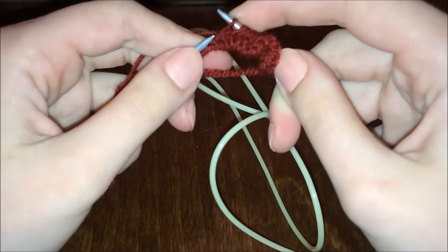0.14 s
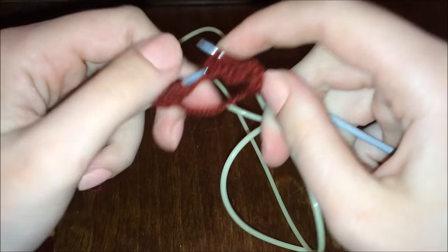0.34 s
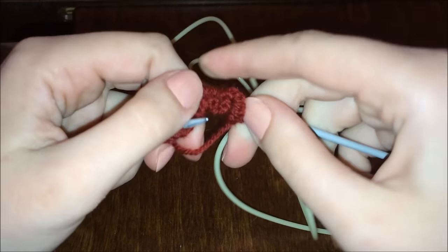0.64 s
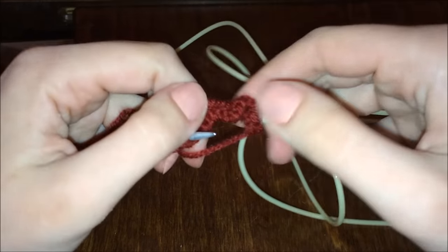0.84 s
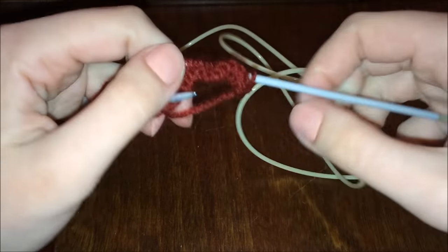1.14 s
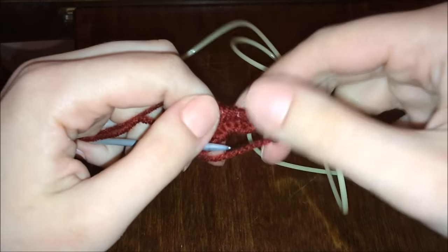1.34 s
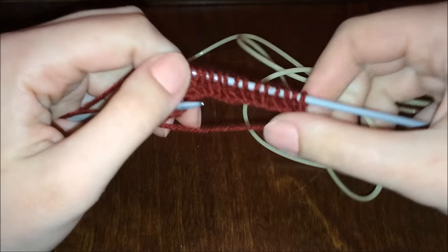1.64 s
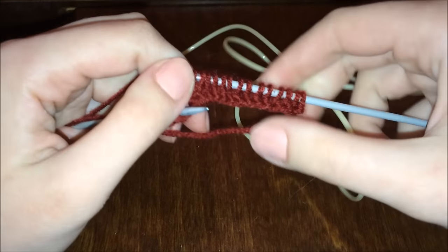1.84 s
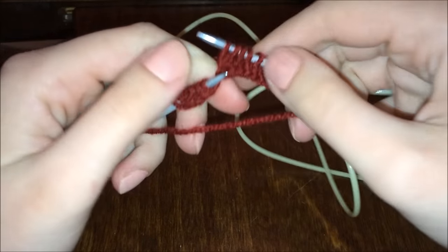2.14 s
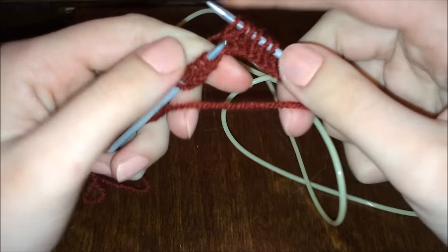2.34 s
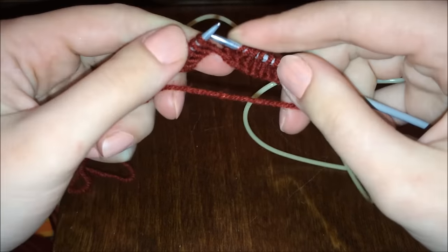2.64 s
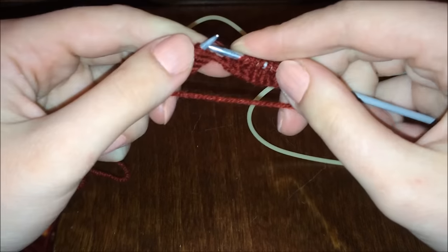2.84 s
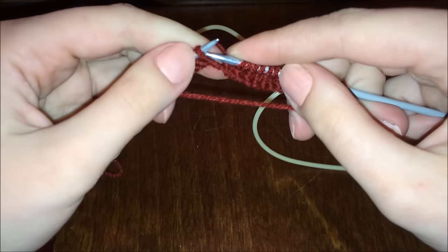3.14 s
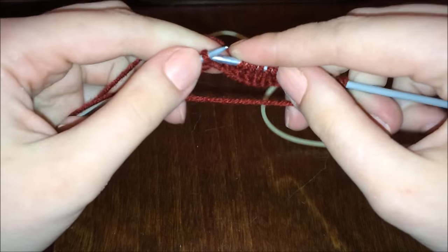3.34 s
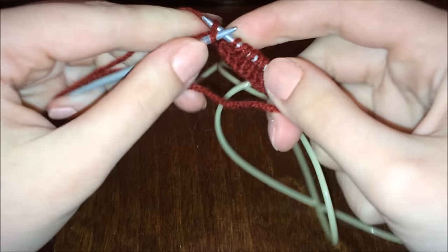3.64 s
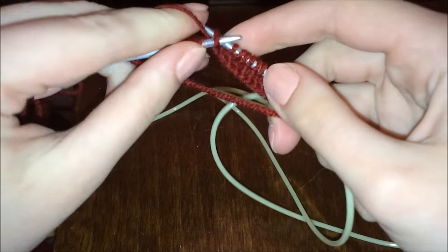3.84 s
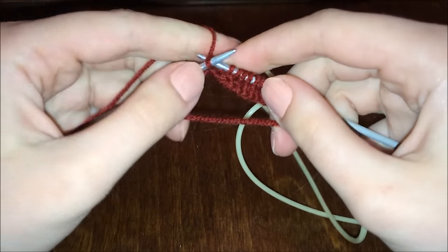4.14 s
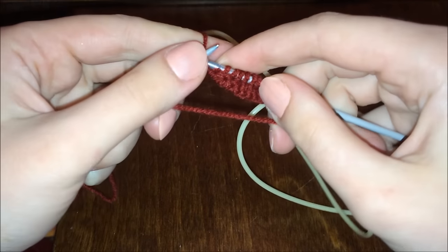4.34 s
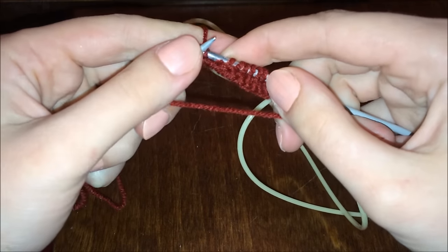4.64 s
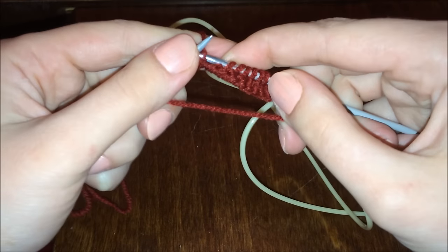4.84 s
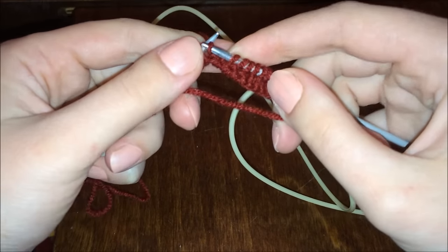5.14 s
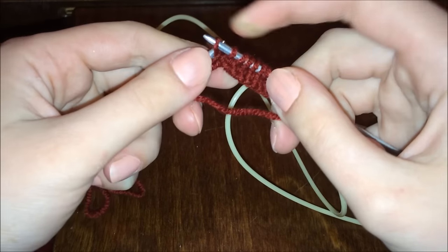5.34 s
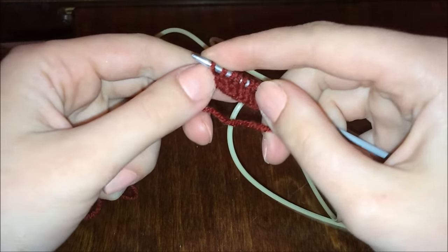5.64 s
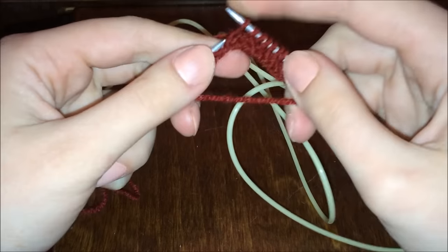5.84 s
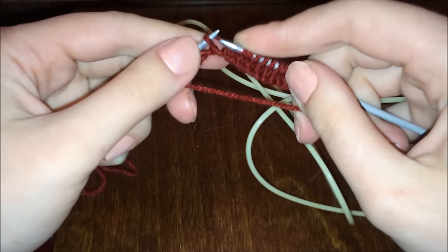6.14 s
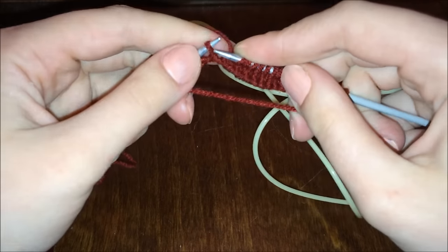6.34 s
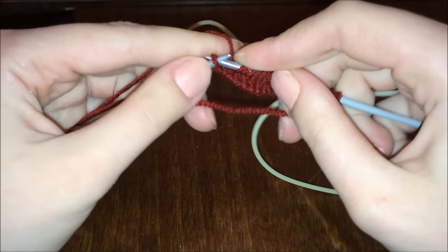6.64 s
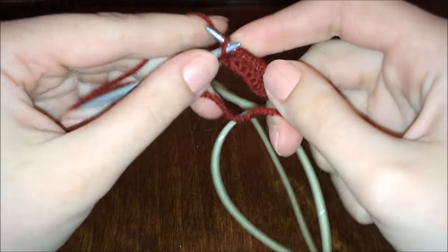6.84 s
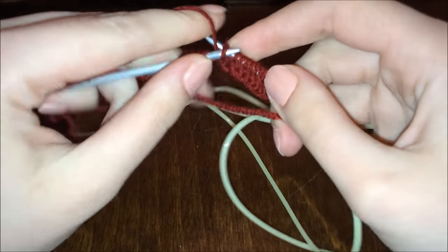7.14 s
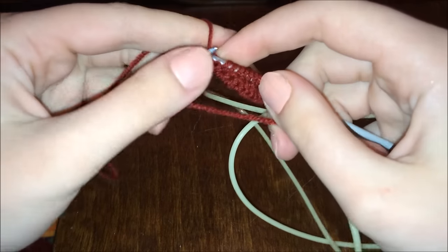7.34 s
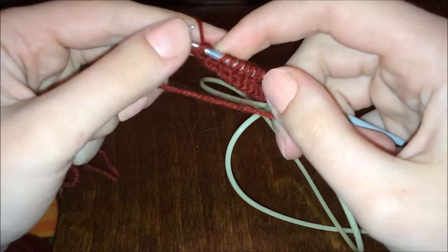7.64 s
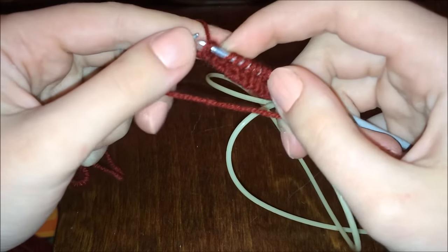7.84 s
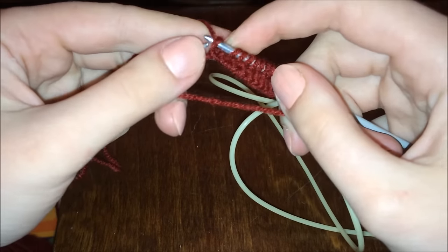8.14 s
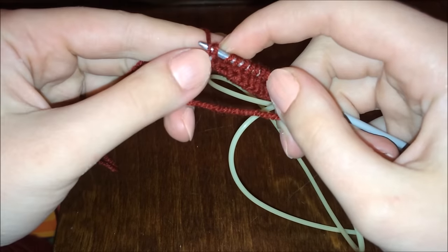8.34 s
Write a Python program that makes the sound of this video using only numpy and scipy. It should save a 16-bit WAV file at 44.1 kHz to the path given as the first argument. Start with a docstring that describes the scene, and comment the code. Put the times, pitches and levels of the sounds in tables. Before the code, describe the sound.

Close phone pickup in a small quiet room: after a faint tick and yarn rustle, hollow metal needles click in a dense irregular burst while their cord raps a wooden table, one early knock by far the loudest. The clicks then thin out to a few isolated taps among soft scuffs, faint low thumps and hand movement over a steady noise floor.

```python
"""Hands knit with hollow metal needles over a wooden table in a small quiet room, close to a phone.
A faint click and a rustle of yarn open; from 0.9 to 3.8 s needles click densely, as cracks and dying modes,
and from 1.1 to 3.6 s their cord knocks on the table, waking its modes. From 2.8 s soft low thumps join;
then clicks thin out to a faint last one at 8.4 s. Scuffs of shaped noise come and go until 7.8 s.
Arm rumble, skin shuffle and a floor of noise run throughout; clicks and knocks leave a short room tail."""
import sys
import numpy as np
from scipy import signal
from scipy.fft import rfft, irfft
from scipy.io import wavfile
from scipy.ndimage import uniform_filter1d

SR = 44100
rng = np.random.default_rng(int(sys.argv[2]) if len(sys.argv) > 2 else 0)


def unload_wav(signal):
    """Save mono or channel-first audio to the path in sys.argv[1] as 16-bit WAV at rate SR, clipped to [-1, 1]."""
    wavfile.write(
        sys.argv[1],
        SR,
        np.round(np.clip(np.atleast_2d(signal).T, -1, 1) * 32767).astype(np.int16),
    )


N = 375291  # length in samples


# needle on needle: start_s, shaft_peak_db, tip_peak_db, brightest_tip_pitch_hz, lift_of_that_pitch_db
NEEDLE_CLICKS = [(0.219, -61, -52.5, 8500, 7), (0.853, -30.5, -31, 4670, 12),
                 (1.043, -26.5, -25.5, 4630, 15), (1.08, -19, -17.5, 5500, 13),
                 (1.256, -33.5, -41.5, 6610, 13), (1.263, -52, -45.5, 6400, 5),
                 (1.318, -63, -39.5, 7900, 12), (1.341, -31.5, -44.5, 3400, 6),
                 (1.452, -34.5, -51.5, 6500, 23), (1.78, -34.5, -36.5, 3700, 18),
                 (2.19, -73, -50, 8000, -3), (2.228, -54.5, -52, 3070, 6), (2.478, -29, -34.5, 6800, 10),
                 (2.542, -28.5, -38.5, 4700, 10), (2.66, -54, -49.5, 3130, 6),
                 (2.734, -28.5, -32.5, 4660, 4), (2.765, -34, -44, 3150, 15),
                 (3.055, -33, -31.5, 9000, 15.5), (3.061, -29.5, -58, 3140, 5),
                 (3.553, -53, -40.5, 8060, -2), (3.568, -55, -53, 4500, 11), (3.593, -27.5, -34, 3200, 4),
                 (3.84, -57, -45.5, 3980, 12), (4.082, -58, -42, 5200, 11), (4.604, -26, -26, 4800, 9),
                 (5.066, -65, -53.5, 10700, 16), (5.849, -27, -26, 4800, 13.5),
                 (6.95, -42, -34.5, 6350, 11), (7.738, -50.5, -51, 3240, -2), (7.778, -67, -49, 11200, 4),
                 (8.41, -66, -45, 4320, 29)]
# modes of a held needle's shaft, the lowest row the table beneath it: pitch_hz, level_db, t60_s
SHAFT_MODES = [(158.3, -16, 0.17), (237, -11, 0.11), (907, 5.5, 0.017), (1110, -2, 0.015), (1280, 1, 0.049),
               (1665, 1.5, 0.02), (1842, -6, 0.029), (2150, -1, 0.023), (2290, -2.5, 0.04),
               (2765, -10.5, 0.045)]
# short ring of the tips: pitch_hz, level_db, t60_s
TIP_RING_MODES = [(2070, -4, 0.023), (2770, -15, 0.01), (3130, -6.5, 0.02), (3750, -10.5, 0.029),
                  (4330, -11.5, 0.011), (4640, -10, 0.0057), (5330, -5.5, 0.015), (6030, -5, 0.011),
                  (7300, -12, .014), (8090, -10, 0.017), (9100, -11, .01)]
# colour of the tips' crack: pitch_hz, level_db (per Hz)
TIP_CRACK = [(1500, -10), (2500, -4.5), (3180, -2.5), (3500, -7), (3750, -9.5), (4300, -12), (4750, -6.5),
             (5100, -15.5), (5370, -9.5), (5900, -16.5), (6600, -8), (7150, -9.5), (7900, -17),
             (9300, -14.5), (11000, -20.5), (13000, -18.5), (15500, -26)]
TIP_RING_DB = -3  # peak of the ring against the crack
# a firm tap sounds flat, a lighter touch is brighter: tilt in dB per octave for each dB below firm
FIRM_TIP_DB, SHARPEN_PER_DB = -29, 0.41


def clicks(scatter_db=1.5, detune=0.006, shaft_lag_s=0.0007):
    """The tips crack, then tips and shafts ring; rows: towards the phone, towards the walls."""
    out = np.zeros((2, N))
    shaft_hz, shaft_mode_db, shaft_t60 = np.transpose(SHAFT_MODES)
    ring_hz, ring_db, ring_t60 = np.transpose(TIP_RING_MODES)
    against = np.pi * np.arange(len(shaft_hz))  # neighbouring modes swing against each other
    push = twice(contact_s=0.00045, again_s=0.001072, again_db=-11.5)
    for start_s, shaft_db, tip_db, tip_hz, lift_db in NEEDLE_CLICKS:
        sharp_db = SHARPEN_PER_DB * (FIRM_TIP_DB - tip_db)

        # where the needles touch and how the fingers hold them
        pitch_place, level_place = rng.standard_normal((2, len(shaft_hz)))
        mode_hz = shaft_hz * (1 + detune * pitch_place)
        mode_db = shaft_mode_db + scatter_db * level_place
        shaft = np.convolve(ring(mode_hz, mode_db, shaft_t60, against), push)
        shaft = peaked(shaft, shaft_db)

        pitch_place, level_place, phase_place = rng.standard_normal((3, len(ring_hz)))
        tip_mode_hz = ring_hz * (1 + detune * pitch_place)
        # the brightest pitch beams at the phone; averaged over all directions it stands out less
        for side, share in zip(out, (1, 1 / 3)):
            side_lift_db = share * lift_db
            peak_db = tip_db - (1 - share) * lift_db / 2
            tip_crack = crack(TIP_CRACK, 0.001256, tip_hz, side_lift_db, sharp_db)
            tip_mode_db = ring_db + touch(ring_hz, tip_hz, side_lift_db, sharp_db)
            tip_mode_db = tip_mode_db + scatter_db * level_place
            tip_ring = ring(tip_mode_hz, tip_mode_db, ring_t60, np.pi * phase_place)
            add(side, start_s, peaked(tip_crack, peak_db))
            add(side, start_s + shaft_lag_s, shaft)
            add(side, start_s + shaft_lag_s, peaked(tip_ring, peak_db + TIP_RING_DB))
    return out


# cord on the table, before the low cut: start_s, body_peak_db, hardness_db (per octave), crack_peak_db
CORD_KNOCKS = [(1.081, -10, 3, -19.5), (1.288, -26, -4, -65), (1.355, -24.5, -3.5, -70),
               (1.808, -17.5, -0.5, -34), (2.555, -17.5, 2.5, -34.5), (2.751, -20, -1.5, -43),
               (3.074, -23.5, 0, -65), (3.61, -19.5, -0.5, -35.5)]
# modes of the wooden top: pitch_hz, level_db, t60_s
TABLE_MODES = [(161.3, -15, 0.18), (224.3, -5, 0.15), (342, -5, 0.057), (541, 1.5, 0.046), (643, -3, 0.045),
               (826, 6.5, 0.013), (1130, -0.5, 0.021), (1324, -7.5, 0.041), (1480, -3, 0.019),
               (1629, 4, 0.057), (2060, -21, 0.0073), (2530, -16, 0.09), (3110, 6, 0.078), (4450, 3, 0.017),
               (5400, -14, .012)]
# colour of cord cracking on wood: pitch_hz, level_db (per Hz)
CORD_CRACK = [(1500, -35), (2500, 7), (4000, 1), (6000, -9), (9000, -12), (15500, -26)]
TABLE_LOW_HZ = 109  # the top radiates little below this


def knocks(scatter_db=2.5, body_lag_s=0.001317):
    """The cord cracks, then slaps twice as it lies down; a harder slap wakes the top's higher modes."""
    out = np.zeros(N)
    hz, db, t60 = np.transpose(TABLE_MODES)
    push = twice(contact_s=0.00055, again_s=0.0015, again_db=2.5)
    for start_s, body_db, hard_db, crack_db in CORD_KNOCKS:
        hardness = hard_db * np.log2(hz / hz[2])  # tilt about the third mode
        mode_db = db + hardness + scatter_db * rng.standard_normal(len(hz))
        body = np.convolve(ring(hz, mode_db, t60, np.pi / 2), push)
        add(out, start_s + body_lag_s, peaked(body, body_db))
        add(out, start_s, peaked(crack(CORD_CRACK, 0.00154), crack_db))
    low_cut = signal.butter(2, TABLE_LOW_HZ, "high", fs=SR, output="sos")
    return signal.sosfilt(low_cut, out)


# yarn or a finger slips along a shaft: middle_s, length_s, rustle_db, rub_db
SHAFT_SCUFFS = [(0.425, 0.11, -72, -79), (0.831, 0.036, -63, -80), (1.113, 0.16, -58, -51),
                (1.456, 0.095, -75, -66.5), (1.676, .3, -62.5, -76), (2.092, 0.059, -67.5, -64),
                (2.204, 0.018, -66, -74), (2.262, 0.14, -68.5, -63.5), (3.216, 0.37, -104, -73),
                (3.575, .04, -70, -59), (3.917, 0.2, -84, -68), (4.067, 0.082, -73, -54),
                (4.144, 0.17, -73, -64.5), (4.886, 0.026, -61.5, -69), (5.4, 0.064, -74, -84),
                (5.924, 0.036, -68, -75), (6.063, .04, -76, -64.5), (6.285, 0.081, -89, -66.5),
                (6.887, 0.12, -64, -65), (6.959, 0.15, -62.5, -65), (7.102, 0.27, -78, -69.5),
                (7.375, 0.06, -67.5, -60.5), (7.56, 0.076, -77, -66.5), (7.748, 0.023, -60.5, -66)]
# colour of yarn fibres: pitch_hz, level_db (per Hz)
YARN_COLOUR = [(500, 6), (2000, -24), (4000, -4.5), (9000, -5), (15000, -3.5)]
# colour of needles rubbing: pitch_hz, level_db (per Hz)
RUB_COLOUR = [(400, -25), (700, 0), (1100, -6), (1500, -3), (2100, -2), (2900, -11), (3500, -8), (4500, -5),
              (5300, -9), (6000, -18), (9000, -26)]
YARN_DB, YARN_SWELL_DB = -75, 3.5  # constant hiss under the scuffs, depth of its slow wander


def scuffs():
    """Fibres hiss over the shafts and needles scrape along each other: flickering noise in swells."""
    yarn_gain = undb(YARN_DB + YARN_SWELL_DB * walk(12))
    rub_gain = np.zeros(N)
    for middle_s, length_s, rustle_db, rub_db in SHAFT_SCUFFS:
        swell = np.hanning(int(length_s * SR))
        add(yarn_gain, middle_s - length_s / 2, undb(rustle_db) * swell)
        add(rub_gain, middle_s - length_s / 2, undb(rub_db) * swell)
    fibres = coloured(YARN_COLOUR, N) * undb(3 * walk(400) + 2 * walk(40))
    rub = coloured(RUB_COLOUR, N) * undb(3 * walk(300))
    return unit(fibres) * yarn_gain + unit(rub) * rub_gain


# a wrist or the yarn ball settles on the table: start_s, peak_db, pitch_hz
SETTLING_THUMPS = [(2.807, -44.5, 179), (4.877, -59.5, 72.7), (5.439, -62, 270), (5.5, -47.5, 59),
                   (6.009, -62, 133), (6.224, -57, 96), (6.275, -56.5, 264), (6.837, -58, 109),
                   (7.649, -61.5, 274), (7.736, -58, 77)]


def thumps(t60=0.13, rise_s=0.0058):
    """Soft low pushes on the table: decaying sines with a rounded onset."""
    out = np.zeros(N)
    t = np.arange(int(SR / 4)) / SR
    for start_s, peak_db, hz in SETTLING_THUMPS:
        envelope = (1 - np.exp(-t / rise_s)) * fade(t, t60)
        add(out, start_s, peaked(envelope * np.sin(2 * np.pi * hz * t), peak_db))
    return out


# moving hands, gliding from point to point: time_s, arm_rumble_db
ARM_MOVEMENT = [(0.0, -68.5), (0.23, -69.5), (1.16, -62), (1.26, -63.5), (1.54, -68), (1.78, -65),
                (2.58, -73), (2.91, -60), (3.82, -62), (4.17, -77.5), (4.41, -79), (4.6, -72.5),
                (5.88, -65), (6.33, -67.5), (6.99, -71.5), (7.09, -71), (7.46, -83), (8.51, -67)]
# colour of the arms' rumble through the table: pitch_hz, level_db (per Hz)
ARM_COLOUR = [(20, -40), (45, 1), (80, -1), (150, 2.5), (260, -3.5), (450, -20), (900, -65)]
# colour of shuffling skin: pitch_hz, level_db (per Hz)
SKIN_COLOUR = [(300, -15), (600, -1), (1200, -3.5), (2200, -11.5), (3500, -15.5), (7000, -29)]
SKIN_DB, SKIN_FOLLOWS = -75, 0.95  # shuffle at mean movement; dB gained per dB of rumble


def arms_and_skin():
    """Moving arms shake the table as low noise; skin shuffles louder the more they move."""
    arm_db = np.interp(np.arange(N) / SR, *np.transpose(ARM_MOVEMENT))
    skin_gain = undb(SKIN_DB + SKIN_FOLLOWS * (arm_db - arm_db.mean()))
    skin = coloured(SKIN_COLOUR, N) * undb(2 * walk(100) + 2 * walk(20))
    arms = coloured(ARM_COLOUR, N) * undb(2.3 * walk(25))
    return unit(skin) * skin_gain + unit(arms) * undb(arm_db)


# bands of the room tail: centre_hz, level_db, t60_s
ROOM_BANDS = [(496, -48.5, 0.16), (1400, -46.5, 0.21), (2340, -41, 0.2), (5130, -42, 0.068),
              (9900, -38, 0.19)]


def room(dry, gap_s=0.005, build_s=0.00058):
    """Dense reflections after a short gap; each band dies at its own pace."""
    t = np.arange(int(SR / 2)) / SR
    tail = 0
    for hz, db, t60 in ROOM_BANDS:
        hump = [(hz / 4, -40), (hz / 1.5, -3), (hz, 0), (hz * 2.45, -3), (hz * 4, -40)]
        tail = tail + undb(db) * coloured(hump, len(t)) * fade(t, t60)
    tail = tail * (1 - np.exp(-t / build_s))
    tail = np.r_[np.zeros(int(gap_s * SR)), tail]
    return signal.fftconvolve(dry, tail)[:N]


# colour of the floor of room and microphone: pitch_hz, level_db (per Hz)
FLOOR_COLOUR = [(15, -7), (25, -19), (113, 0), (240, -8.5), (349, 0.5), (762, -9.5), (945, -5),
                (1240, -8.5), (1850, -9.5), (5010, -23), (12500, -26.5), (15500, -39)]
FLOOR_DB = -65.5


def noise_floor():
    """Noise of room and microphone, its level wavering slightly."""
    return coloured(FLOOR_COLOUR, N) * undb(FLOOR_DB + 0.85 * walk(18))


def crack(points, spread_s, peak_hz=5000., lift_db=0., sharp_db=0., size=1024):
    """A spectrum whose bands arrive scattered over a few ms, as bending waves along a rod do."""
    hz, db = np.transpose(points)
    f = np.maximum(np.fft.rfftfreq(size, 1 / SR), 1)
    colour_db = np.interp(np.log(f), np.log(hz), db, -90) + touch(f, peak_hz, lift_db, sharp_db)
    # one random delay for every four bins
    scatter = 0.5 + np.minimum(rng.exponential(size=size // 8 + 1), 3)
    lag_s = spread_s * np.repeat(scatter, 4)[:len(f)]
    turn = np.exp(-2j * np.pi * np.cumsum(lag_s) * SR / size)  # phase that gives these delays
    return irfft(undb(colour_db) * turn, size)[:size // 2]


def touch(f, peak_hz, lift_db, sharp_db):
    """Colour of one contact in dB: a favoured pitch and a tilt per octave about it."""
    favoured = lift_db / (1 + ((f - peak_hz) / 300.) ** 2)
    return favoured + sharp_db * np.log2(f / peak_hz)


def twice(contact_s, again_s, again_db):
    """Force of a contact that lands, lifts and lands again."""
    slap = np.hanning(int(contact_s * SR) + 3)
    push = np.zeros(int(again_s * SR) + len(slap))
    push[:len(slap)] += slap
    push[-len(slap):] += undb(again_db) * slap
    return push


def ring(hz, db, t60, phase):
    """Sum of dying modes after one impulse, a quarter second long."""
    t = np.arange(int(SR / 4))[:, None] / SR
    modes = undb(db) * fade(t, t60) * np.sin(2 * np.pi * hz * t + phase)
    return modes.sum(axis=1)


def coloured(points, size):
    """Noise with the given (Hz, dB) spectrum, rms 1."""
    hz, db = np.transpose(points)
    f = np.maximum(np.fft.rfftfreq(size, 1 / SR), 1)
    gain = undb(np.interp(np.log(f), np.log(hz), db, -90))
    return unit(irfft(rfft(rng.standard_normal(size)) * gain, size))


def walk(rate):
    """Random levels, rate per second, joined by straight glides; spread near 1."""
    k = int(SR / rate)
    held = np.repeat(rng.standard_normal(N // k + 1), k)
    return uniform_filter1d(held, k)[:N]


def undb(db):
    """Decibels to gain."""
    return 10 ** (np.asarray(db) / 20)


def fade(t, t60):
    """Envelope that loses 60 dB in t60 seconds."""
    return np.exp(-np.log(1000) * t / t60)


def unit(x):
    """Scale to rms 1."""
    return x / np.sqrt(np.mean(x ** 2))


def peaked(x, db):
    """Scale to the given peak."""
    return x * undb(db) / np.abs(x).max()


def add(out, start_s, x):
    """Mix x into out from start_s on."""
    i = int(start_s * SR)
    out[i:i + len(x)] += x[:N - i]


def scene():
    """Clicks and knocks with their room tail, the hands' softer sounds and the floor."""
    near, walls = clicks() + knocks()
    hands = scuffs() + thumps() + arms_and_skin()
    return (near + room(walls) + hands + noise_floor())[None]


def record(dry):
    """The phone cuts the top steeply above 15.6 kHz."""
    top_cut = signal.ellip(10, 0.2, 45, 15600, fs=SR, output="sos")  # ripple dB, stop-band dB, Hz
    return signal.sosfilt(top_cut, dry)


dry = scene()
out = record(dry)
unload_wav(out)
```